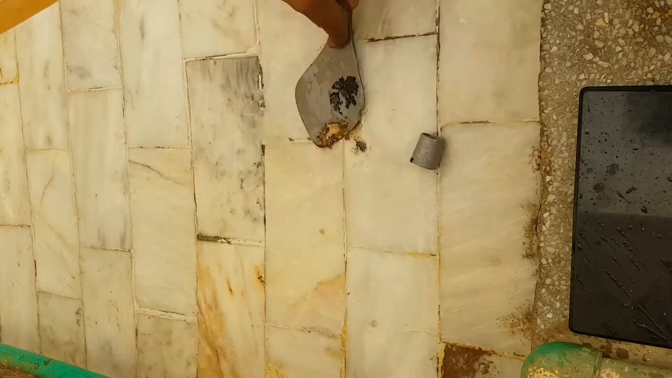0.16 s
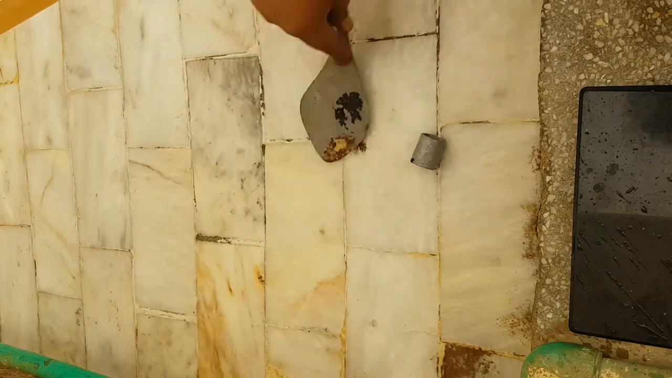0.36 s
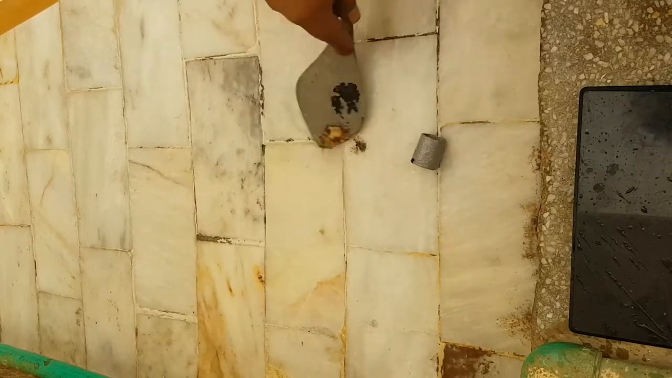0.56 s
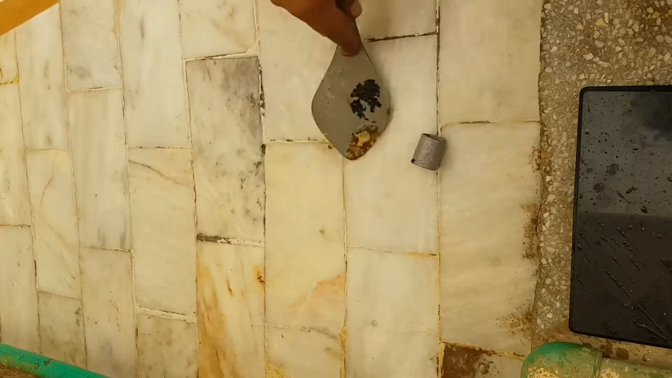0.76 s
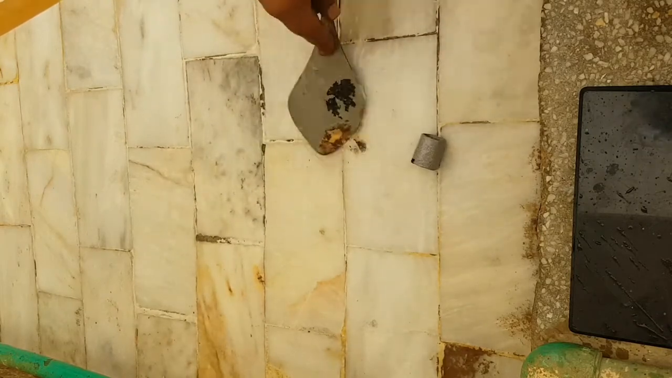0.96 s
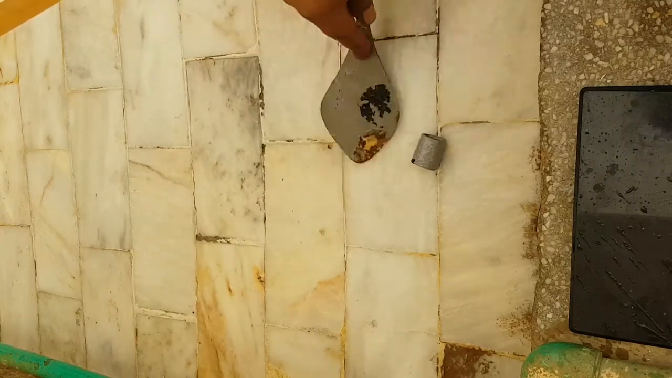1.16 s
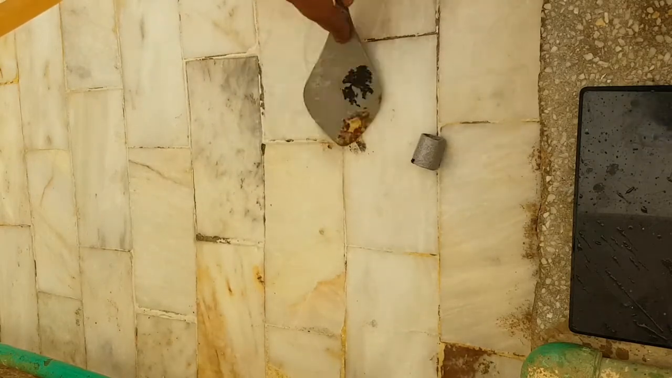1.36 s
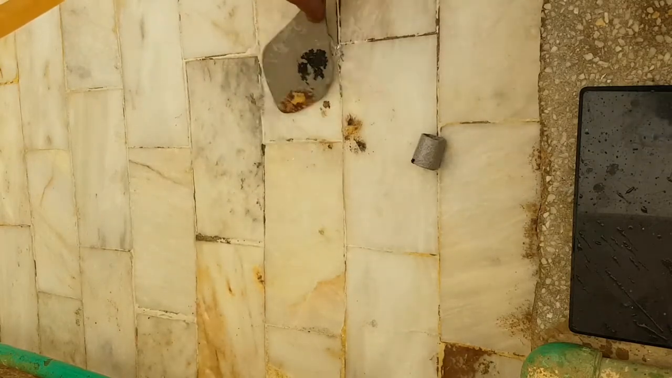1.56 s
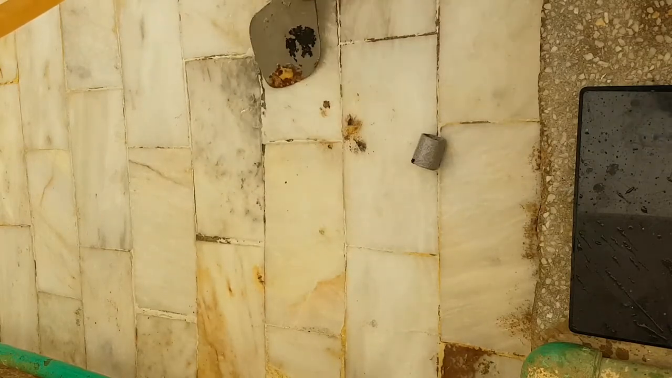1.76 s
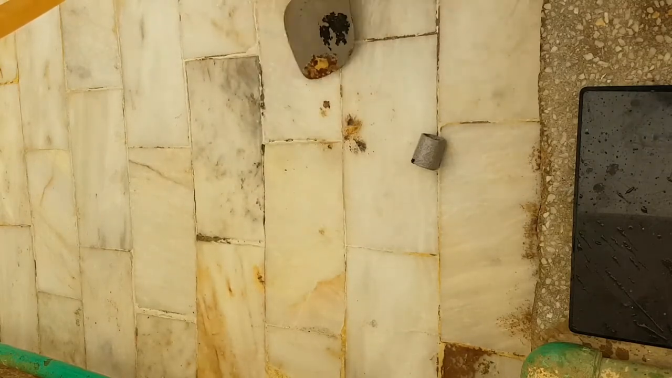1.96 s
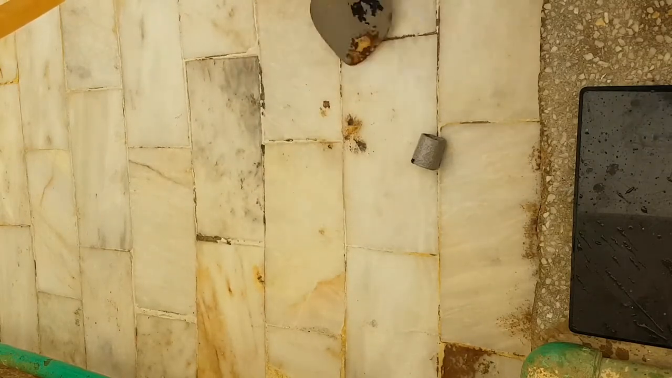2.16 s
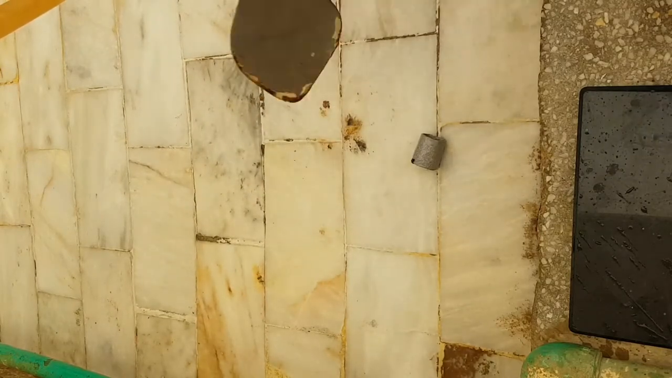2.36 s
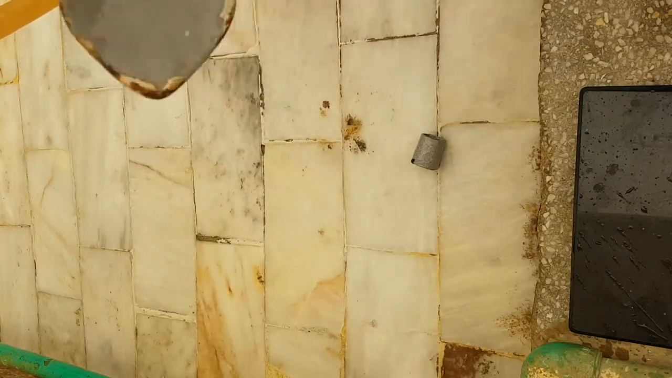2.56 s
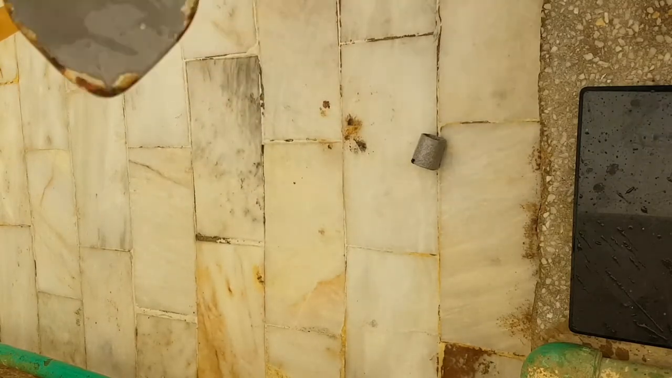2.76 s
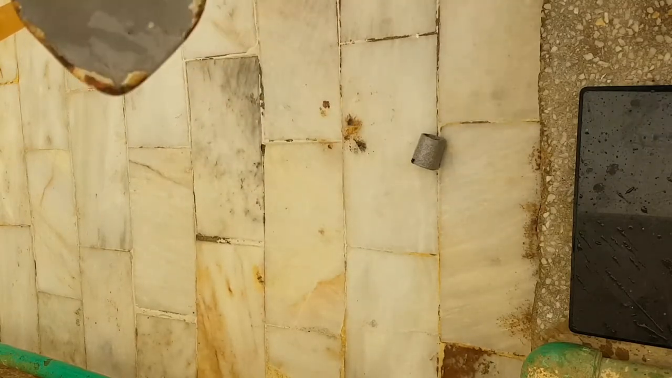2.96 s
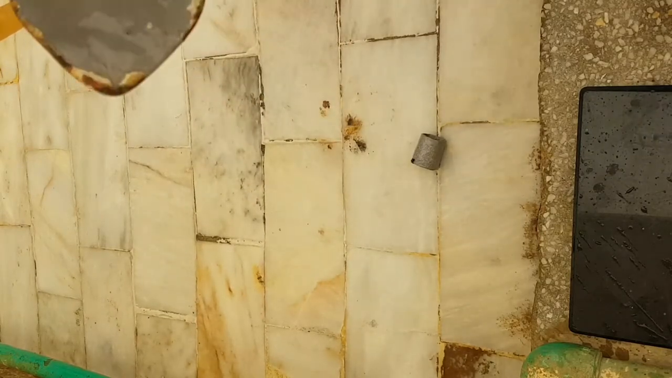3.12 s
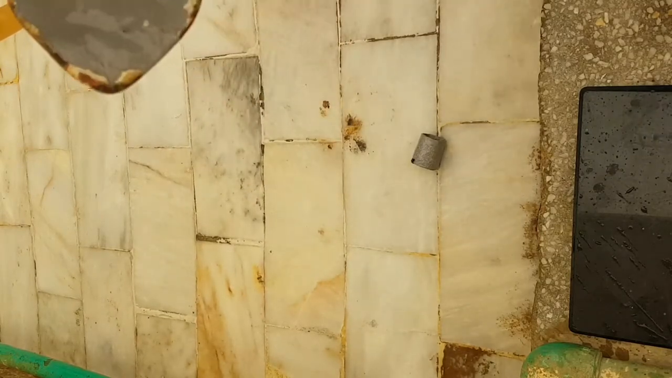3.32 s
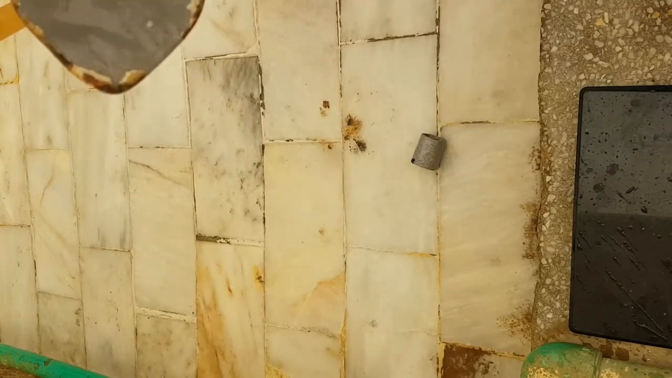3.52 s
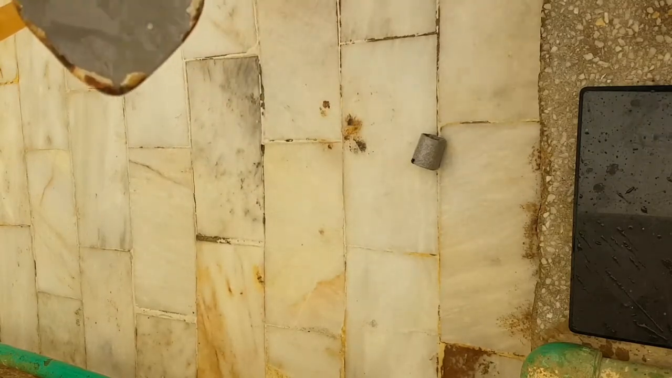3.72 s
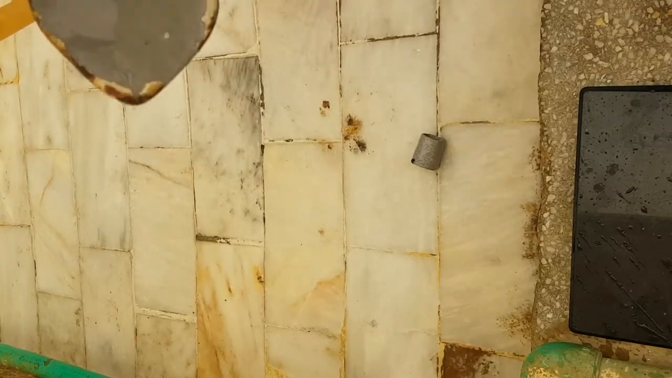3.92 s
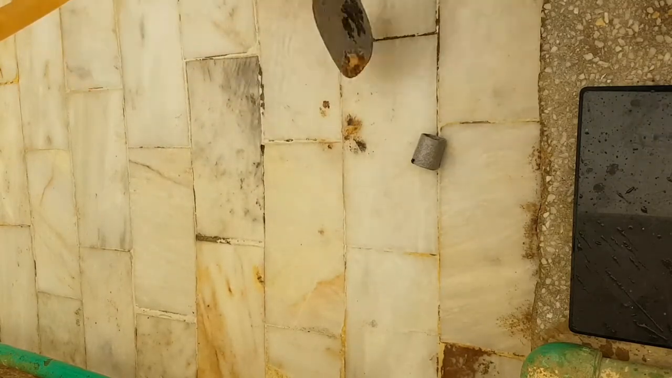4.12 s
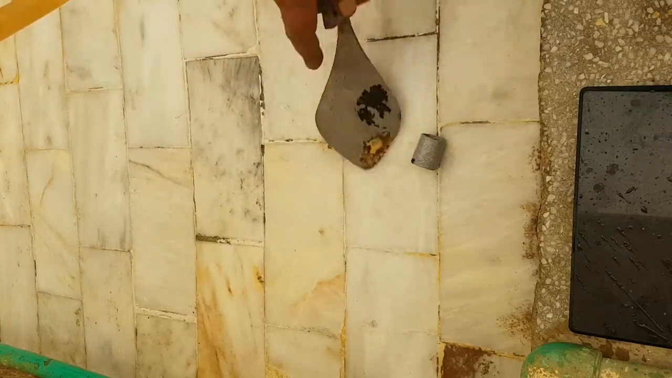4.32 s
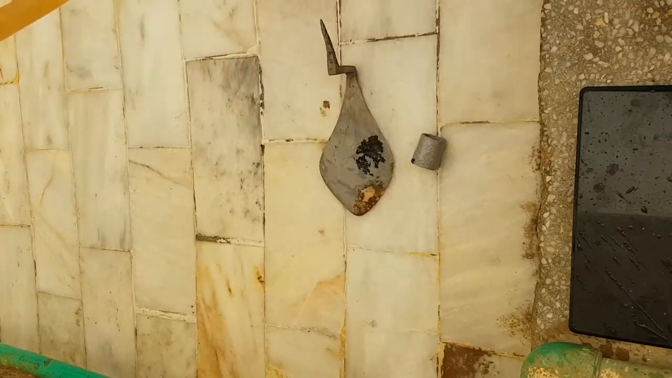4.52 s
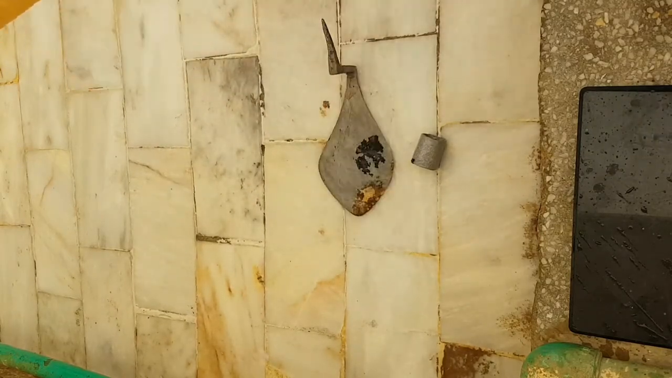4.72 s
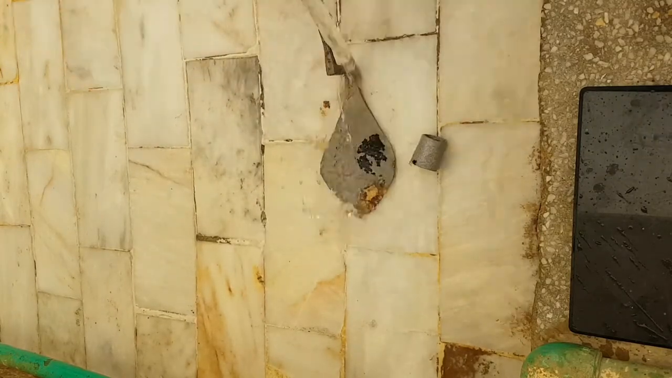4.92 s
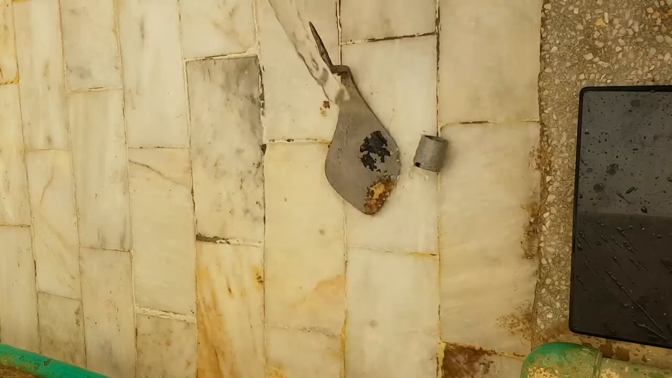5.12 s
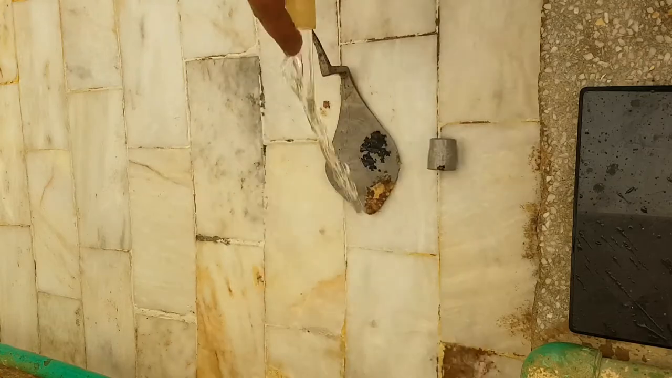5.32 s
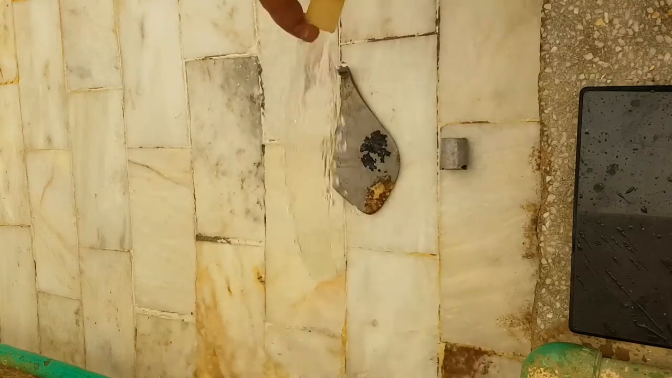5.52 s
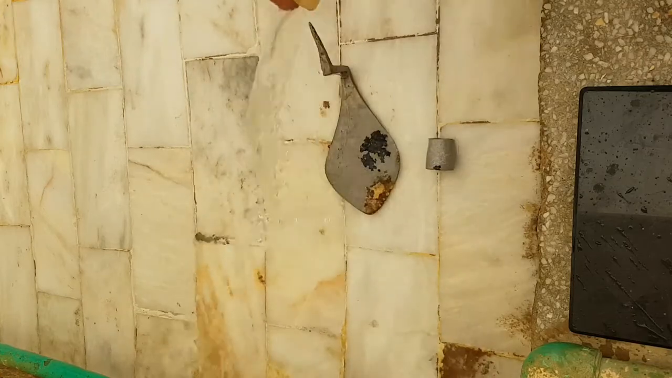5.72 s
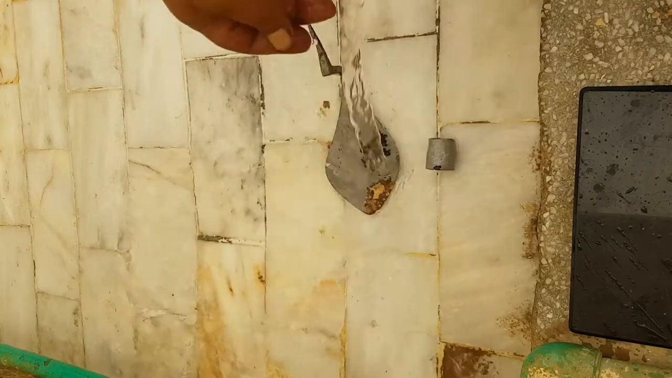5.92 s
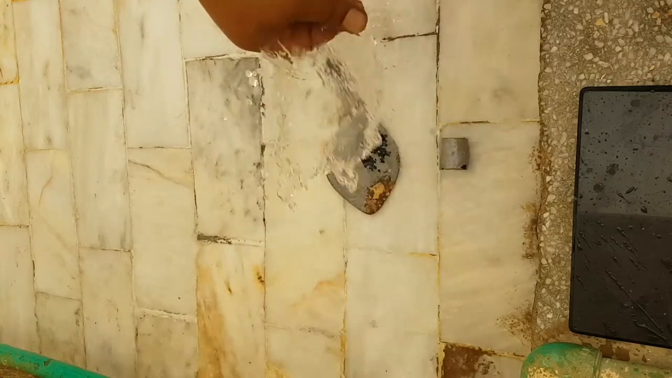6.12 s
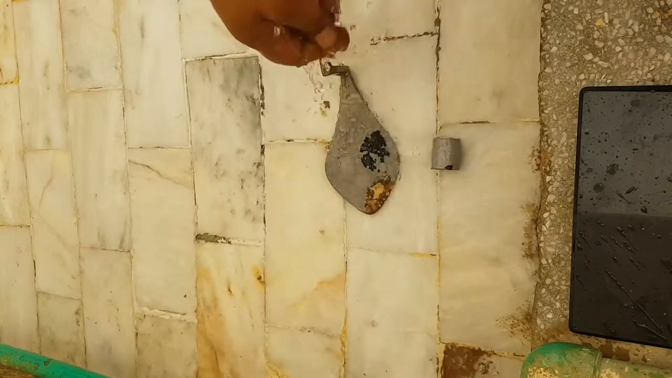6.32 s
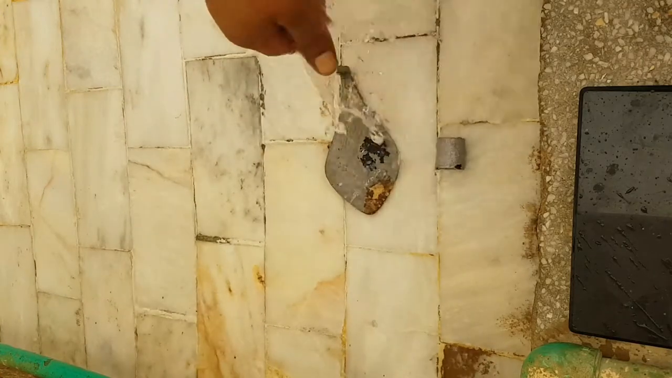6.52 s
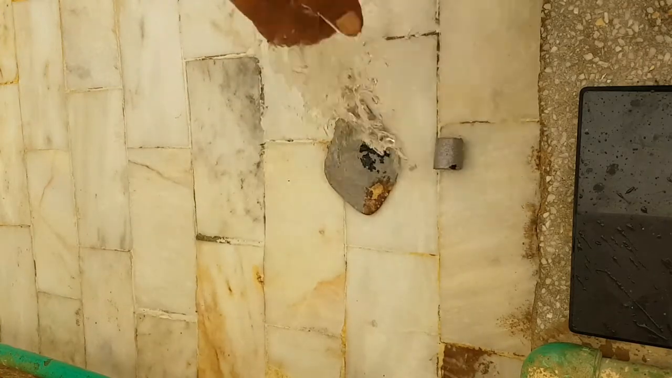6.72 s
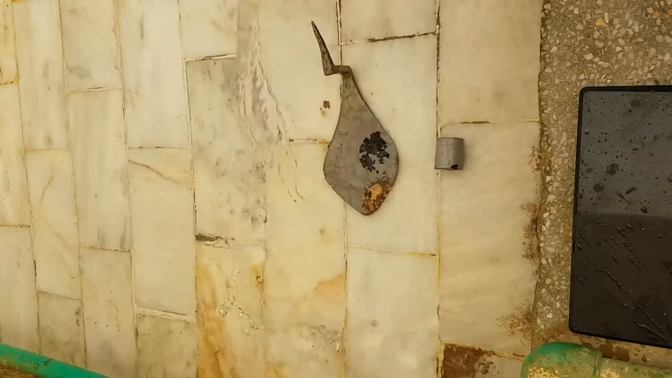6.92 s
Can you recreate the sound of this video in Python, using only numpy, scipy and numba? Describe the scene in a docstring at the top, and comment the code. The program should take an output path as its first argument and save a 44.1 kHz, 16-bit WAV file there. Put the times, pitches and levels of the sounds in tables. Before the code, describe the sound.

Two metallic taps lead into rapid scratching of a blade on stone, with sharp chattering squeaks. The scraping stops, leaving faint air and a low background rumble. A brief bright clatter marks the tool being put down, then water dribbles, splashes and drips in bursts. Close stereo microphone, open air, short reflections from nearby walls, one far-off crow caw.

```python
"""In a courtyard outdoors, close to a marble floor: a steel trowel is tapped and scraped, then laid down with a clink.
The steel is noise and impacts through the blade's modes; let go, the blade rings in decaying sines.
Water tossed over it by hand spatters, drips and bubbles on the stone: ringing grains, hiss and rising tones.
Far off a crow caws, a pulse train through throat resonances. Low background noise, quiet at first, steps up
just after 1.1 s and then holds, under faint outdoor air. Nearby walls add a short stereo tail."""
import sys
import numpy as np
from scipy import signal
from scipy.fft import rfft, irfft, next_fast_len
from scipy.io import wavfile
from numba import njit

SR = 44100
rng = np.random.default_rng(int(sys.argv[2]) if len(sys.argv) > 2 else 0)


def bounce(signal):
    """Save signal as a 16-bit WAV file at the path given by the first command-line argument."""
    frames = np.transpose(np.atleast_2d(signal))
    limited = np.clip(frames, -1, 1)
    pcm = np.round(limited * 32767).astype(np.int16)
    wavfile.write(sys.argv[1], SR, pcm)


N = 307818  # samples, about 7 s

# Tone of the low background noise. Each row: frequency in Hz, gain in dB.
LOW_NOISE_COLOUR = [(20, -20), (45, -13), (75, -6), (115, -1.5), (170, -7), (250, -13.5), (500, -28),
                    (1500, -56)]
# Tone of the outdoor air. Each row: frequency in Hz, gain in dB.
AIR_COLOUR = [(120, -35), (250, -8.5), (400, -7.5), (680, -11), (820, -13), (1300, -16), (2200, -18.5),
              (3900, -20.5), (4700, -26), (9300, -33), (15500, -32.5)]
# Arched call of the distant crow. Each row: time in seconds, pitch in Hz, level in dB.
CAW = [(4.9, 438.3, -61), (4.99, 461, -48), (5.07, 479, -46), (5.14, 476.6, -48), (5.22, 459, -50),
       (5.36, 430, -57)]
# Resonances of the crow's throat. Each row: frequency in Hz, gain in dB.
THROAT = [(300, -25), (600, -21), (930, -7.5), (1400, -6), (1950, 2), (2400, -8), (3000, -25), (4000, -31),
          (6000, -48)]
# Dribbles and handfuls of water. Each row: start in seconds, pouring time in seconds,
# spray strength in dB, gurgle strength in dB.
TOSSES = [(4.74, .2, -65, -53.5), (4.96, 0.27, -59, -69), (5.324, .01, -48.5, -54), (5.477, .21, -49, -64),
          (5.69, .26, -45.5, -50), (6.02, .09, -50.5, -48.5), (6.235, .67, -43.5, -59)]
# Tone of the water spray. Each row: frequency in Hz, gain in dB.
SPRAY_COLOUR = [(880, -51), (1500, -9.5), (2030, -1.5), (2260, -3.5), (4480, -4), (4990, -7), (9790, -13),
                (14900, -11.5), (15500, -16)]
# Air pockets that ring in the wet. Each row: start in seconds, peak in dB, starting pitch in Hz.
BUBBLES = [(2.298, -42, 3080), (2.783, -39.5, 3900), (3.458, -35.5, 3840), (4.758, -44.5, 560),
           (4.906, -25.5, 2050), (5.07, -38.5, 870), (5.195, -35.5, 1930), (5.572, -34.5, 2040),
           (5.584, -31, 1420), (5.596, -37.5, 642), (5.625, -35.5, 1020), (5.681, -38.5, 744),
           (5.715, -36, 880), (5.729, -33, 706), (5.731, -39.5, 1410), (5.852, -42, 525),
           (5.867, -32, 1990), (6.067, -37, 564), (6.074, -39, 1920), (6.105, -44, 734),
           (6.182, -36.5, 1880), (6.209, -32.5, 1840), (6.415, -28.5, 1970), (6.425, -29.5, 1620),
           (6.554, -26.5, 1835), (6.672, -41, 560), (6.786, -36.5, 1969), (6.935, -32.5, 2770),
           (6.961, -34.5, 2700)]
# Fat drops on the stone. Each row: start in seconds, level in dB before the decay.
SPLATS = [(4.988, -40), (5.348, -42), (5.868, -35), (5.929, -32.5), (5.946, -40), (6.097, -37),
          (6.183, -37), (6.231, -33), (6.246, -31.5), (6.426, -35), (6.556, -36), (6.72, -34.5),
          (6.834, -33.5)]
# Modes of the blade damped by hand and floor. Each row: frequency in Hz, width in Hz, relative gain in dB.
HELD_BLADE = [(1022, 158, -4), (1286, 220, -1), (1710, 157, 4), (2260, 43, 16.5), (2580, 490, 2.5),
              (4030, 460, 6), (4780, 770, -3), (6440, 310, -0.5)]
# Modes of the free blade. Each row: frequency in Hz, strength struck at the tip in dB,
# strength struck at the heel in dB, time to fall by 60 dB in seconds.
FREE_BLADE = [(1617, -15, 1, 0.25), (1650, -3, -22, 0.23), (2296, -15, 2, .22), (2560, -18, -17, 0.12),
              (2820, -6.5, -15, 0.1), (3540, -31, -2.5, 0.26), (3900, -9, -14, 0.16), (4520, -35, -4, 0.27),
              (5100, -1.5, -16, 0.11), (6420, -7, -18, .12), (6820, -17, -7, 0.16), (8650, -23, -8, 0.15),
              (10210, -22, -15, .12)]
# Tone of grit on the stone. Each row: frequency in Hz, gain in dB.
GRIT_COLOUR = [(400, -10.5), (900, -2), (2000, 5.5), (4000, -3), (5200, -3.5), (6500, 1), (8000, -3),
               (9800, -5.5), (11500, -9), (15500, -8)]
# Blows and rebounds of the blade on the floor. Each row: start in seconds, gain in dB,
# contact resonance in Hz, crack against steel in dB, rustling tail in dB before its decay.
TAPS = [(0.204, -27, 1670, 1.5, -38), (.413, -11, 2310, -5.5, -46), (.419, -22.5, 2270, 3, -59),
        (1.191, -15.5, 2280, -15, -47), (4.436, -15.5, 1840, -15, -40.5), (4.4376, -26, 1370, -17, -60),
        (4.453, -24.5, 2670, -8.5, -56)]
# Rings of the blade as it is let go. Each row: start in seconds, gain in dB, place struck from tip 0 to heel 1,
# focus on the main mode in dB per octave, contact time in seconds, silent after this many seconds.
CLINKS = [(4.3428, -25.5, 0.067, 1.5, 0.00074, 0.047), (4.382, -33, 0.92, 23, .004, .06),
          (4.394, -28, 0.73, 14.5, 0.0022, 0.11), (4.427, -24, 0.64, 15, 0.0017, 0.027),
          (4.436, -32, 1, -0.5, 0.0013, .35)]
# Back-and-forth strokes of the tip over the stone. Each row: middle in seconds, length in seconds,
# gain in dB, contact resonance in Hz.
STROKES = [(0.523, 0.039, -44, 1880), (0.626, 0.054, -33.5, 1940), (0.715, 0.077, -35, 2520),
           (0.779, 0.059, -28.5, 1890), (.865, 0.061, -31, 2514), (.939, 0.05, -29.5, 2230),
           (1.032, 0.059, -37.5, 1481), (1.278, 0.1, -37.5, 2386), (1.365, 0.047, -35, 2330),
           (1.455, 0.068, -33, 2570), (1.522, 0.058, -24, 1500), (1.605, 0.082, -33, 2926),
           (1.691, 0.074, -27.5, 2100), (1.779, 0.056, -26, 2110), (1.868, 0.068, -27, 1800),
           (1.955, .046, -28.5, 1964), (2.084, .11, -32, 1760), (2.183, 0.067, -27, 1868),
           (2.342, 0.11, -48.5, 2750), (2.514, 0.073, -44.5, 2870)]
# Moments when the edge catches and chatters, low when the whole blade bends.
# Each row: start in seconds, peak of the tone in dB, mean pitch in Hz.
CATCHES = [(0.628, -22, 2040), (.684, -28.5, 2240), (.727, -27, 3090), (.761, -19.5, 2480),
           (1.005, -32.5, 1950), (1.253, -24, 2210), (1.418, -29.5, 2100), (1.502, -9, 2235),
           (1.516, -17.5, 1380), (1.518, -25.5, 975), (1.603, -21.5, 2920), (1.671, -13.5, 2224),
           (1.677, -31, 953), (1.758, -22.5, 2080), (1.861, -30.5, 1010), (1.938, -16.5, 2100),
           (1.95, -21, 1960), (2.1, -23.5, 1684), (2.158, -14, 1770), (2.173, -13.5, 1748)]
# Stereo spread. Each row: frequency in Hz, gain of the side signal in dB.
WIDTH = [(60, -20), (150, -16), (400, -9), (1300, -8.5), (2400, -8.5), (4400, -4.5), (8000, -1.5),
         (15000, -1.5)]
# Tones of the rustle after a blow, of a splat, and of the walls. Each row: frequency in Hz, gain in dB.
RUSTLE_COLOUR = [(400, -7), (2300, 1.0), (6000, -9.5), (15000, -22.0)]
SPLAT_COLOUR = [(400, -33), (1200, -3.5), (3000, 5.0), (6000, -11.0), (15000, -11.5)]
WALL_COLOUR = [(300, -6.5), (3000, -2.0), (14000, -5.0)]

TOP_HZ = 15800  # highest pitch of a grain, and where the recorder cuts off
STEP_START_S, STEP_LENGTH_S = 1.134, .04  # step up of the low background noise
LOW_NOISE_BEFORE_DB, LOW_NOISE_AFTER_DB, LOW_NOISE_WAVER_DB = -60, -48.5, 1.2
LANDING_S, DRAIN_T60_S, GURGLE_T60_S = 0.015, 0.46, 0.51  # rise of a toss; fall of its spray and gurgle by 60 dB
SLOSH_DB, FILL_S = -8, 0.26  # slosh against spray in a full puddle; time in which it fills
SURGE_DB, SURGE_RATE_HZ = 2, 22  # water leaves the hand in uneven clumps
BUBBLE_T60_S, BUBBLE_SLOPE = 0.031, .6  # ring of a 1 kHz pocket; power by which smaller ones die sooner
CONTACT_T60_S, DULL_DOUBLING_DB = 0.033, 17  # buzz of a blow at 0 dB crack; twice as long for this much less
SWELL_SHARE = .52  # part of a stroke in which the pressure rises
GRIT_DB, FIRM_DB = -8.5, -29.5  # grit against steel in a firm stroke; gain of that stroke
GRIT_SLOPE = 0.17  # dB of grit share lost per dB of force
GRIT_OCTAVE_DB, USUAL_HZ = 4, 2140  # a steeper tip rings higher and is grittier, per octave above the usual
CATCH_SWELL_S = 0.0041  # build-up of a catch at USUAL_HZ; lower ones take longer


def undb(db):
    """Decibels to gain."""
    return 10 ** (np.asarray(db) / 20)


def level(x, db=0):
    """Scale to an rms level."""
    return x * undb(db) / np.sqrt(np.mean(x ** 2) + 1e-20)


def clock(seconds):
    """Sample times of a short sound."""
    return np.arange(int(seconds * SR)) / SR


def fade(t, t60):
    """Exponential decay by 60 dB in t60 seconds."""
    return np.exp(-np.log(1000) * t / t60)


def curves(table):
    """Columns of a table, joined by straight lines in time."""
    seconds, *columns = np.transpose(table)
    return [np.interp(np.arange(N) / SR, seconds, column) for column in columns]


def add(track, start, sound):
    """Mix a sound in at a time in seconds."""
    i = int(start * SR)
    track[i:i + len(sound)] += sound[:max(N - i, 0)]


def colour(x, points):
    """Causal, minimum-phase filter through (Hz, dB) points, built from the folded cepstrum."""
    hz, db = np.transpose(points)
    n = 2 * next_fast_len(len(x) // 2 + 2048)
    gain_db = np.interp(np.log(np.fft.rfftfreq(n, 1 / SR) + 1), np.log(hz), db)
    cepstrum = irfft(np.log(undb(gain_db)))
    cepstrum[1:n // 2] *= 2
    cepstrum[n // 2 + 1:] = 0
    return irfft(rfft(x, n) * np.exp(rfft(cepstrum)))[:len(x)]


def resonate(x, hz, width_hz):
    """One resonance, gain 1 at its centre."""
    return signal.lfilter(*signal.iirpeak(hz, hz / width_hz, fs=SR), x)


def walk(n, rate):
    """Random values joined by straight lines, rate per second, with a spread near 1."""
    return np.interp(np.arange(n) * rate / SR, np.arange(n), rng.standard_normal(n))


def clicks(n, rate, spread_db):
    """Random impacts of uneven size, rate per second."""
    hits = rng.random(n) < rate / SR
    signs = rng.choice([-1, 1], n)
    return level(hits * signs * undb(spread_db * rng.standard_normal(n)))


@njit
def ring_out(n, starts, poles, sizes):
    """Sum of short damped tones, each a complex number turning and shrinking."""
    out = np.zeros(n)
    for k in range(len(starts)):
        z = sizes[k] + 0j
        for i in range(starts[k], min(n, starts[k] + int(-6 / np.log(abs(poles[k]))))):
            out[i] += z.imag
            z *= poles[k]
    return out


def grains(n, rate, spread_db, t60):
    """Tiny impacts that each ring at their own pitch; t60 holds at 3 kHz, higher ones die sooner."""
    draws = np.random.default_rng(rng.integers(2 ** 31))
    when, pitch, size, sign = draws.random((int(rate * n / SR) + 1, 4)).T
    hz = TOP_HZ * (.03 + .97 * pitch)
    decay = t60 * np.sqrt(3000 / hz)
    poles = np.exp((2j * np.pi * hz - np.log(1000) / decay) / SR)
    size_db = spread_db * np.minimum(-np.log(1 - size), 4)
    sizes = np.sign(sign - .5) * undb(size_db) / np.sqrt(decay)
    return level(ring_out(n, (when * n).astype(np.int64), poles, sizes))


def bubble(hz, t60, glide=0.17, swell=0.00059):
    """A pocket of air rings, rising in pitch as it nears the surface."""
    t = clock(1.2 * t60)
    tone = np.sin(2 * np.pi * hz * t * (1 + glide * t / t60 / 2))
    ring = (1 - np.exp(-t / swell)) ** 2 * fade(t, t60) * tone
    return ring / np.abs(ring).max()


def burble(low_hz, high_hz, cycles, range_db, count):
    """Short rising blips of random pitch and size."""
    out = np.zeros(N)
    for when, size, strength in rng.random((count, 3)):
        hz = low_hz * (high_hz / low_hz) ** size
        add(out, when * N / SR, undb(-range_db * strength) * bubble(hz, t60=cycles / hz, glide=0.23))
    return level(out)


def low_noise_gain():
    """The low background noise is quiet at first, steps up just after 1.1 s, then holds with a slow waver."""
    on = np.clip((np.arange(N) / SR - STEP_START_S) / STEP_LENGTH_S, 0, 1)
    steady_db = LOW_NOISE_BEFORE_DB + on * (LOW_NOISE_AFTER_DB - LOW_NOISE_BEFORE_DB)
    return undb(steady_db + LOW_NOISE_WAVER_DB * walk(N, rate=1.98))


def outdoors():
    """Filtered noise, low and stepping up, and gently wavering air; blips for low-middle flutter and faint ticks."""
    low_noise = level(colour(rng.standard_normal(N), LOW_NOISE_COLOUR)) * low_noise_gain()
    hiss = rng.standard_normal(N) + undb(-4) * grains(N, rate=1200, spread_db=3.5, t60=.028)
    air = level(colour(hiss, AIR_COLOUR), -53.5) * undb(0.48 * walk(N, rate=13))
    flutter = undb(-62.0) * burble(low_hz=415, high_hz=737, cycles=68, range_db=6.5, count=130)
    ticks = undb(-68) * burble(low_hz=1100, high_hz=4200, cycles=18, range_db=14, count=120)
    return low_noise + air + flutter + ticks


def crow():
    """One arched caw from far away: pulses of uneven pitch and hoarse noise, shaped by the throat."""
    hz, db = curves(CAW)
    t = np.arange(N) / SR
    phase = np.cumsum(hz * (1 + .042 * walk(N, rate=450))) / SR
    # one pulse per cycle, less its mean
    pulses = level(np.diff(np.floor(phase), prepend=0) - hz / SR)
    voice = pulses + undb(-5) * rng.standard_normal(N)
    calling = (t > CAW[0][0]) * (t < CAW[-1][0])
    return level(colour(voice, THROAT)) * undb(db) * calling


def flow():
    """Strength of spray, gurgle and slosh: each toss lands quickly, fills a puddle while it pours, then drains."""
    power = np.zeros((3, N))
    for start, pour, spray_db, gurgle_db in TOSSES:
        age = np.maximum(np.arange(N) / SR - start, 0)
        landing = np.minimum(age / LANDING_S, 1)
        after = np.maximum(age - pour, 0)
        filling = 1 - np.exp(-(age / FILL_S) ** 2)
        spray = undb(spray_db) * landing * fade(after, DRAIN_T60_S)
        gurgle = undb(gurgle_db) * landing * fade(after, GURGLE_T60_S)
        slosh = undb(spray_db + SLOSH_DB) * filling * fade(after, t60=1.0)
        power += np.array([spray, gurgle, slosh]) ** 2
    return np.sqrt(power) * undb(SURGE_DB * walk(N, rate=SURGE_RATE_HZ))


def water():
    """Tossed water breaks into droplets; small bubbles gurgle in the film, larger ones slosh as it deepens."""
    spray_gain, gurgle_gain, slosh_gain = flow()
    droplets = grains(N, rate=5000, spread_db=3.8, t60=.012)
    # every fat drop bursts into a millisecond of broad hiss
    burst = rng.standard_normal(N)
    impact_power = clicks(N, rate=170, spread_db=5) ** 2
    burst_power = signal.lfilter([1], [1, -np.exp(-1 / (.0008 * SR))], impact_power)
    splats = level(burst * np.sqrt(burst_power))
    spray = level(colour(droplets + .6 * splats, SPRAY_COLOUR)) * undb(1.4 * walk(N, rate=45))
    gurgle = burble(low_hz=982, high_hz=3210, cycles=27.0, range_db=10.0, count=2600)
    slosh = burble(low_hz=299, high_hz=913, cycles=28, range_db=21.0, count=900)
    return spray_gain * spray + gurgle_gain * gurgle + slosh_gain * slosh


def splat(db):
    """A drop flattens on the stone in a short burst of hiss."""
    t = clock(0.045)
    hiss = colour(rng.standard_normal(len(t)), SPLAT_COLOUR)
    return level(hiss, db) * fade(t, t60=0.036)


def drops():
    """Air pockets close with a faint splat and ring, the large ones longest; fat drops only splat."""
    out = np.zeros(N)
    for start, db, hz in BUBBLES:
        t60 = BUBBLE_T60_S * (1000 / hz) ** BUBBLE_SLOPE
        # long-lived pockets rise furthest
        add(out, start, undb(db) * bubble(hz, t60, glide=11 * t60, swell=t60 / 16))
        add(out, start, undb(-16.5) * splat(db))
    for start, db in SPLATS:
        add(out, start, splat(db))
    return out


def blade(push, hz, contact_db, contact_width_hz):
    """The held blade: its damped modes and one resonance that shifts with the grip and angle."""
    modes = 0
    for k, (mode_hz, width_hz, db) in enumerate(HELD_BLADE):
        modes = modes + (-1) ** k * undb(db) * resonate(push, mode_hz, width_hz)
    contact = resonate(resonate(push, hz, contact_width_hz), hz, contact_width_hz)
    return level(level(modes) + level(contact, contact_db))


def taps():
    """At each blow the held blade buzzes briefly against the stone, with a gritty crack and a rustling tail."""
    out, t = np.zeros(N), clock(.4)
    n = len(t)
    for start, db, hz, crack_db, tail_db in TAPS:
        contact = fade(t, CONTACT_T60_S * 2 ** (-crack_db / DULL_DOUBLING_DB))
        rattle = clicks(n, rate=20000, spread_db=1.5)
        crunch = grains(n, rate=6900, spread_db=-9.5, t60=0.03)
        buzz = (rattle + undb(-8.5) * crunch) * contact
        steel = blade(buzz, hz, contact_db=1, contact_width_hz=690)
        blow = steel + level(colour(buzz, GRIT_COLOUR), crack_db)
        tail = level(colour(rng.standard_normal(n), RUSTLE_COLOUR)) * fade(t, t60=0.31)
        # a shorter contact gives less energy
        add(out, start, undb(db) * blow * np.sqrt(np.mean(contact ** 2)) + undb(tail_db) * tail)
    return out


def clinks():
    """Let go, the free blade rings in modes weighted by the place struck, over a short gritty noise."""
    out, t = np.zeros(N), clock(.4)
    n = len(t)
    for start, db, heel, focus_db, push, stop in CLINKS:
        grit = level(colour(rng.standard_normal(n), GRIT_COLOUR))
        ring = undb(-2.5 - focus_db) * fade(t, t60=0.047) * grit
        for hz, tip_db, heel_db, t60 in FREE_BLADE:
            # rocking on the stone detunes and damps each mode unevenly
            phase = 2 * np.pi * np.cumsum(hz * (1 + 0.008 * walk(n, rate=160))) / SR
            mode_db = np.interp(heel, [0, 1], [tip_db, heel_db]) - focus_db * abs(np.log2(hz / 2300))
            ring = ring + undb(mode_db + 2 * walk(n, rate=122)) * fade(t, t60) * np.sin(phase)
        onset = np.minimum(t / push, 1)
        stopping = np.clip((stop - t) / 0.011, 0, 1)
        add(out, start, undb(db) * ring * onset * stopping)
    return out


def chatter(db, hz, swell):
    """The edge catches: a tone that swells and dies within a few cycles, wavering in pitch."""
    t = clock(6 * swell)
    grip = (t / swell * np.exp(1 - t / swell)) ** 3
    phase = 2 * np.pi * np.cumsum(hz * (1 + 0.054 * walk(len(t), rate=440))) / SR
    return undb(db) * grip * (np.sin(phase) + undb(-22.0) * np.sin(2 * phase))


def stroke(length, db, hz):
    """The tip sticks and slips over grit under rising, then falling pressure, with a squeak that falls in pitch."""
    t, swell = clock(length), SWELL_SHARE * length
    n = len(t)
    pressure = undb(np.interp(t, [0, swell, length], [-13, 1, -16])) * signal.windows.tukey(n, .12)
    crunch = grains(n, rate=4000, spread_db=3.5, t60=.034)
    slips = clicks(n, rate=3000, spread_db=2.5) * undb(3 * walk(n, rate=200))
    steel = blade(slips + undb(-2.5) * crunch, hz, contact_db=-4.0, contact_width_hz=900)
    # the free length of the edge keeps changing, so its squeak wanders
    octaves = -2.5 * (t - swell) + .11 * walk(n, rate=90) + .07 * walk(n, rate=900)
    phase = 2 * np.pi * np.cumsum(hz * 2 ** octaves) / SR
    squeak = level(np.sin(phase) * undb(5 * walk(n, rate=200)), -3.5)
    # a light stroke has a larger share of grit than a firm one
    grit_db = GRIT_DB - GRIT_SLOPE * (db - FIRM_DB) + GRIT_OCTAVE_DB * np.log2(hz / USUAL_HZ)
    grit = level(colour(crunch + undb(-10) * slips, GRIT_COLOUR), grit_db)
    return undb(db) * (pressure * level(steel + squeak) + pressure ** 0.83 * grit)


def scraping():
    """Strokes of the tip over the stone; now and then the edge catches and chatters."""
    out = np.zeros(N)
    for middle, length, db, hz in STROKES:
        add(out, middle - length / 2, stroke(length, db, hz))
    for start, db, hz in CATCHES:
        add(out, start, chatter(db, hz, CATCH_SWELL_S * np.sqrt(USUAL_HZ / hz)))
    return out


def stereo(mid, side):
    """Left and right: alike in the bass, wide in the treble."""
    side = colour(side, WIDTH)
    return np.array([mid + side, mid - side])


def spread(x, count=8):
    """Short floor reflections shift all the time, so the treble reaches the two sides unalike."""
    paths = np.array([walk(N, rate=63) for _ in range(count)])
    paths /= np.linalg.norm(paths, axis=0)
    lags = rng.integers(2, 90, count)  # samples
    side = sum(gain * np.pad(x, (lag, 0))[:N] for gain, lag in zip(paths, lags))
    return stereo(x, side)


def courtyard(x, t60=0.36, wet_db=-19):
    """Nearby walls return a short tail of decaying noise, strongest near 3 kHz, different at each ear."""
    t = clock(.6)
    sides = []
    for _ in range(2):
        echoes = rng.standard_normal(len(t)) * fade(t, t60) * (t > .008)
        tail = colour(echoes, WALL_COLOUR)
        sides.append(signal.fftconvolve(x, undb(wet_db) * tail / np.linalg.norm(tail))[:N])
    return np.array(sides)


def scene():
    """Trowel and water close to the microphone, the crow far off, over air and low background noise."""
    near = water() + drops() + taps() + clinks() + scraping()
    return stereo(outdoors(), outdoors()) + spread(crow() + near) + courtyard(near)


def record(dry):
    """The recorder rounds the loudest peaks and cuts the top."""
    rounded = dry / (1 + (dry / .6) ** 4) ** .25
    top_cut = signal.ellip(10, .2, 80, TOP_HZ, fs=SR, output="sos")
    return signal.sosfilt(top_cut, rounded)


dry = scene()
out = record(dry)
bounce(out)
```